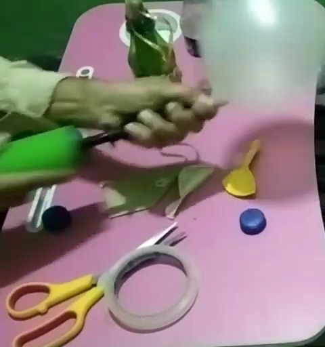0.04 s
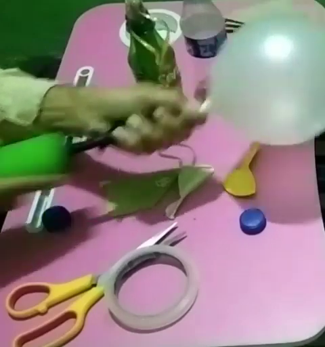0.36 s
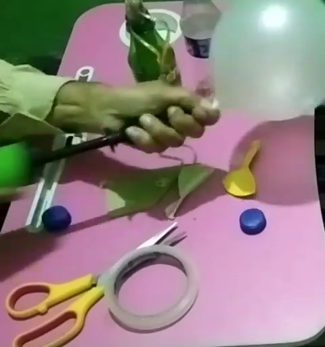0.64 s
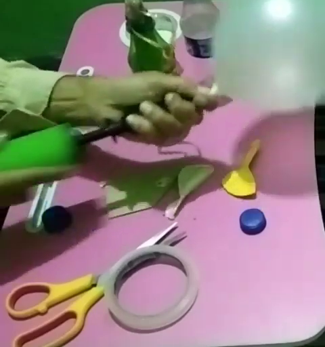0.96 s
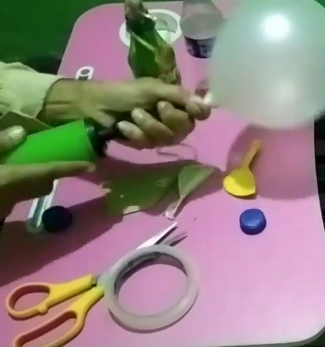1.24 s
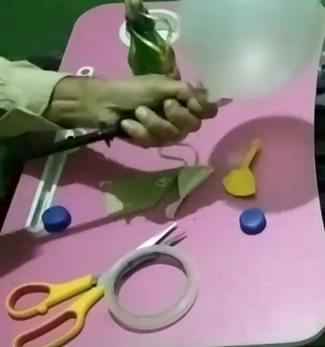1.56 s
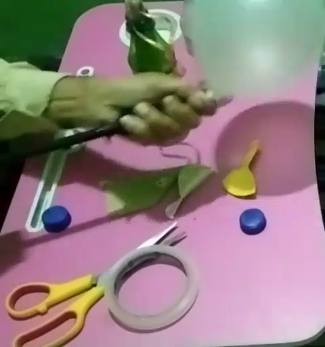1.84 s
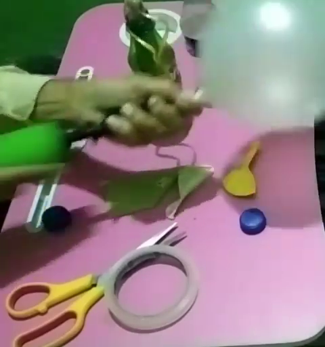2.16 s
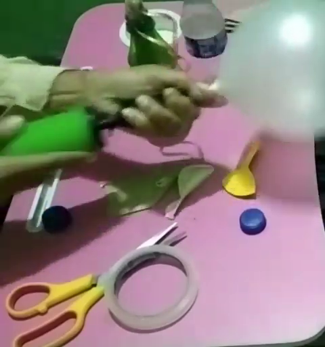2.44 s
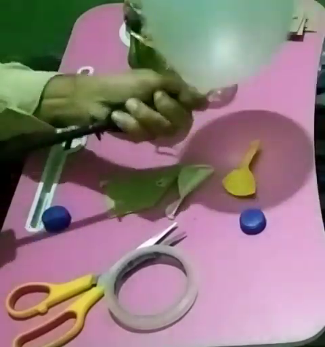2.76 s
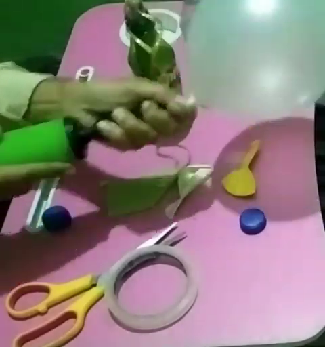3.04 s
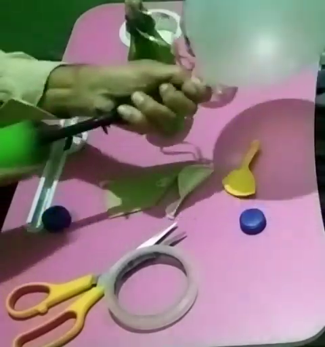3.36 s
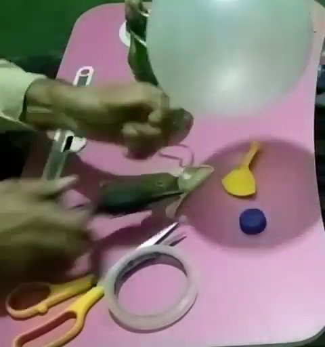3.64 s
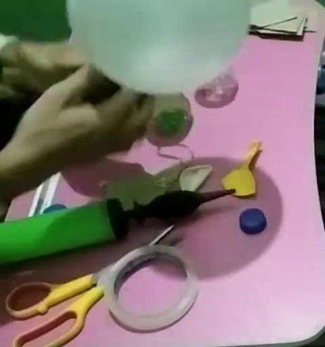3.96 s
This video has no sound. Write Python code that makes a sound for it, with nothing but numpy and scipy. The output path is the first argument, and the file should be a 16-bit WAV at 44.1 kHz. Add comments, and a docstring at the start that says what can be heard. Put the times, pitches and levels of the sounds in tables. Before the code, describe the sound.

Close up in a small, quiet room, a hand pump puffs air into a balloon about four times a second, whistling faintly between pushes. After a brief squeak and a few more strokes, it is set down with a knock.

```python
"""Quick hisses and thin whistles, about four a second: a plastic hand pump blows up a balloon.
Each push forces air through the nozzle, each pull makes the intake valve whistle, and the piston
taps as it turns round. The seal squeaks briefly and a faint hum wavers near the end.
Then the pump is put down on a table with a bump and a knock, all in a small room."""
import sys
import numpy as np
from scipy import signal
from scipy.fft import rfft, irfft
from scipy.io import wavfile
from scipy.ndimage import uniform_filter1d

SR = 44100
rng = np.random.default_rng(int(sys.argv[2]) if len(sys.argv) > 2 else 0)


def unload_audio(sound):
    """Save the sound as a 16-bit wav file, at the path given as the first command line argument."""
    columns = np.transpose(np.atleast_2d(sound))
    # keep every value between -1 and 1, then stretch to whole-number steps
    steps = np.round(np.clip(columns, -1, 1) * 32767)
    wavfile.write(sys.argv[1], SR, steps.astype(np.int16))


N = 176400
TIME = np.arange(N) / SR

# Tone of the soft hiss of indrawn air and of sliding skin: (frequency [Hz], level [dB])
SOFT_HISS = [(200, -17.5), (400, -14), (1000, -12.5), (2200, -5), (4000, 1), (5200, -1.5), (7300, 4.5),
             (9000, -2.5), (11000, -13.5), (15500, -12)]


def pump_strokes():
    """A push drives a jet of air and rubs the piston along the barrel; a pull draws air in softly."""
    # Pushes: (start [s], rise [s], hold [s], nozzle hiss [dB], piston rub [dB], intake hiss [dB])
    pushes = [(-.02, 0.028, 0.017, -27, -43.5, -46), (0.157, 0.039, .028, -23.5, -39, -40.5),
              (0.355, 0.044, 0.02, -23, -41, -46), (0.54, 0.044, 0.029, -25.5, -39.5, -46.5),
              (0.742, 0.045, 0.025, -25.5, -39.5, -47.5), (0.967, 0.053, 0.0068, -25, -45, -47),
              (1.212, 0.037, 0.022, -23.5, -43, -54.5), (1.435, 0.043, 0.01, -21.5, -43, -45.5),
              (1.667, 0.032, 0.02, -20, -41, -44.5), (1.898, 0.031, 0.025, -22.5, -40, -48),
              (2.162, 0.017, 0.025, -20, -41, -46), (2.385, 0.024, 0.033, -21.5, -42, -46),
              (2.597, 0.045, 0.0055, -19, -39.5, -45), (2.815, 0.049, 0.015, -21, -41, -50.5),
              (3.043, 0.028, 0.017, -19.5, -38.5, -46.5), (3.259, 0.039, 0.013, -23.5, -45.5, -43.5)]
    # Tones of the jet's high fizz, the piston and the sliding rod: (frequency [Hz], level [dB])
    fizz_tone = [(5000, -12), (9000, 0), (15500, 0)]
    rub_tone = [(100, -45), (300, -15.5), (450, 1), (650, 6), (900, -2.5), (1200, 1.5), (1800, -0.5),
                (2600, -3), (5000, -19.5)]
    rod_tone = [(1000, -14), (2200, -4), (4000, -1.5), (7300, 1), (10000, -10.5), (15500, -14.5)]
    jet = fizz = rub = intake = 0
    for start, rise, hold, jet_db, rub_db, intake_db in pushes:
        end = start + rise + hold
        speed = ramp(start, rise)
        leak = from_db(-36.5) * arch(start - 0.02, 0.04)  # a little air escapes ahead of the push
        flow = speed ** 1.53 * fade(end, db_per_s=472.5) + leak
        jet += from_db(jet_db) * flow
        fizz += from_db(jet_db - 14) * flow ** 1.5  # faster air sounds brighter
        rub += from_db(rub_db) * speed * fade(end, db_per_s=370.5)
        intake += from_db(intake_db) * arch(end + 0.004, length=0.14)
    air = jet * nozzle_jet() + fizz * noise(fizz_tone)
    air += rub * noise(rub_tone) + intake * noise(SOFT_HISS)
    rod = from_db(-51) * fade(3.42, db_per_s=205) * noise(rod_tone)  # lasts until the pumping stops
    hiss = swirl(air + rod)
    flutter_db = 1.76 * drift(rate_hz=90)
    return hiss * from_db(flutter_db - 3.5)


def nozzle_jet():
    """Rushing air makes a broad hiss, and the nozzle rings at a few high pitches."""
    # Tone of the hiss: (frequency [Hz], level [dB])
    jet_tone = [(500, -33.5), (1200, -18.5), (2800, -16.5), (3700, -10.5), (4600, -3), (5800, -9),
                (7400, -6.5), (8400, -3), (9300, -10.5), (11000, -14), (15500, -20)]
    # The nozzle's ringing: (pitch [Hz], width [Hz], level [dB])
    nozzle_rings = [(4820, 120, -31.5), (5460, 330, -6), (6126, 170, -1), (6780, 140, 0.5), (7300, 80, 3),
                    (7470, 100, 0.5), (7890, 130, 0.5), (8300, 160, -17), (9420, 90, -6.5)]
    white, rings = rng.standard_normal(N), 0
    for k, (hz, width, db) in enumerate(nozzle_rings):
        decay = np.exp(-np.pi * width / SR)
        feedback = [1, -2 * decay * np.cos(2 * np.pi * hz / SR), decay ** 2]
        rings += (-1) ** k * from_db(db) * (1 - decay ** 2) * signal.lfilter([1, 0, -1], feedback, white)
    return unit_level(noise(jet_tone) + from_db(2.5) * unit_level(rings))


def swirl(hiss, depth_db=2.4):
    """Swirling air favours narrow bands of pitch that keep changing."""
    bands = signal.stft(hiss, nperseg=512)[2]
    patches = rng.standard_normal(bands.shape)
    for axis in (0, 1):  # smooth across pitch, then across time
        patches = uniform_filter1d(patches, 3, axis=axis)
    gains = unit_level(from_db(depth_db * unit_level(patches)))
    return signal.istft(bands * gains, nperseg=512)[1][:N]


def valve_and_seal():
    """The intake valve whistles with a slight rasp; the seal squeaks with an overtone."""
    # Valve whistles and seal squeaks: (start [s], length [s], first [Hz], last [Hz], level [dB])
    whistles = [(0.044, 0.058, 4340, 4330, -44), (0.071, 0.066, 3634, 3700, -44),
                (0.267, 0.049, 4400, 4000, -48.5), (0.452, 0.074, 4080, 3710, -39.5),
                (0.631, .035, 4700, 4920, -43.5), (0.647, 0.063, 4080, 3900, -38),
                (0.838, 0.038, 4940, 4170, -41), (0.859, 0.041, 4100, 4000, -42.5),
                (1.087, 0.054, 3670, 3260, -42.5), (1.307, 0.031, 3920, 3310, -47),
                (1.323, 0.071, 3230, 3050, -48.5), (1.523, 0.096, 3493, 3580, -43),
                (1.767, 0.067, 3280, 3550, -44), (1.988, 0.12, 3190, 3045, -48.5),
                (2.269, 0.056, 3444, 3590, -41.5), (2.476, 0.1, 3375, 3646, -41),
                (2.712, 0.089, 2980, 3180, -51.5), (2.933, .085, 3080, 3216, -43),
                (3.149, 0.045, 4070, 3580, -38.5), (3.375, 0.045, 4200, 3510, -43)]
    squeaks = [(2.43, 0.044, 1756, 1850, -43.5), (2.859, 0.036, 1240, 1265, -27.5),
               (2.884, 0.048, 1310, 1396, -39.5)]
    wander = 0.011 * drift(rate_hz=200)
    rasp_hz, tones = 240, 0
    rasp = 1 + 0.42 * (drift(rasp_hz) + 1j * drift(rasp_hz))  # shakes both level and phase
    for row in whistles:
        level, phase = glide(*row, wander)
        tones += level * np.real(rasp * np.exp(1j * phase))
    for row in squeaks:
        level, phase = glide(*row, 2 * wander)
        overtone = from_db(-10) * drift(rasp_hz) * np.sin(2 * phase)
        tones += level * (np.real(rasp * np.exp(1j * phase)) + overtone)
    flicker_db = 2 * drift(rate_hz=60)
    return tones * from_db(flicker_db - 4.5)


def piston_taps():
    """The rod knocks in the barrel: a round thump in the hands, a hollow knock and a short tick."""
    # Taps as the stroke turns: (time [s], thump [dB], knock [dB], tick [dB])
    taps = [(.062, -62, -42, -50), (.36, -49.5, -54, -50), (.521, -71, -65, -42.5),
            (.729, -57.5, -44, -44.5), (.937, -82, -46, -57), (1.178, -64, -38, -47),
            (1.429, -43, -32, -49.5), (1.612, -72, -58, -42.5), (1.764, -47.5, -23.5, -45),
            (1.852, -50, -44, -43), (1.888, -49.5, -31.5, -51), (2.006, -39.5, -45, -52),
            (2.128, -47, -29, -41), (2.246, -40, -24, -49.5), (2.329, -64, -59.5, -43),
            (2.362, -45.5, -28, -43.5), (2.478, -36, -26, -46), (2.561, -50, -48.5, -48.5),
            (2.586, -47, -32, -45.5), (2.936, -38.5, -32.5, -75), (3.026, -48.5, -46, -65.5),
            (3.143, -39.5, -35, -50)]
    # The barrel's ringing: (pitch [Hz], level [dB], time to fade by 60 dB [s])
    barrel_modes = [(530, -21.5, .03), (712, -7, 0.02), (900, -36, .025), (1410, -31, .025)]
    # Tones of the thump and the tick: (frequency [Hz], level [dB])
    thump_tone = [(50, -4), (80, -5.5), (120, 0.5), (190, -3.5), (280, 2), (450, -3), (800, -30)]
    tick_tone = [(400, -7.5), (900, 8.5), (1800, 3), (4000, -5), (7500, -1.5), (10000, -18.5),
                 (15500, -25.5)]
    thump_rise_s, tick_rise_s = 0.0073, 0.0023
    thumps, ticks, knocks = 0, 0, []
    for at, thump_db, knock_db, tick_db in taps:
        thumps += from_db(thump_db - 10) * ramp(at, thump_rise_s) * fade(at + thump_rise_s, db_per_s=447)
        ticks += from_db(tick_db) * ramp(at, tick_rise_s) * fade(at + tick_rise_s, db_per_s=802)
        knocks.append((at, knock_db))
    return thumps * noise(thump_tone) + strike(knocks, barrel_modes) + ticks * noise(tick_tone)


def hands():
    """Skin slides lightly over plastic and rubber, and rubs dully where the grip shifts."""
    # Slides and shifts of grip: (start [s], length [s], level [dB])
    slides = [(3.211, 0.04, -48.5), (3.476, 0.046, -56.5), (3.509, 0.072, -63.5), (3.571, 0.058, -56.5),
              (3.715, 0.036, -84)]
    grips = [(0.051, 0.039, -45.5), (0.333, 0.053, -54.5), (0.934, 0.035, -57), (1.415, 0.046, -53.5),
             (1.761, 0.036, -50), (2.006, 0.054, -53.5), (2.245, 0.03, -52), (2.478, 0.044, -57),
             (2.92, 0.036, -50.5), (3.009, 0.05, -53), (3.135, 0.046, -49.5), (3.294, 0.08, -47),
             (3.38, .05, -51.5), (3.517, 0.036, -56)]
    # Tone of the dull rub: (frequency [Hz], level [dB])
    grip_tone = [(60, -11), (120, -7.5), (200, 3.5), (300, -0.5), (450, 1), (700, -5.5), (1300, -13),
                 (2500, -14.5), (5000, -15)]
    sliding = sum(from_db(db) * arch(start, length) for start, length, db in slides)
    gripping = sum(from_db(db) * arch(start, length) for start, length, db in grips)
    return sliding * noise(SOFT_HISS) + gripping * noise(grip_tone)


def set_down(knock_s=3.897):
    """The barrel scuffs down softly, then the hard end cracks on the table top and rattles out."""
    # Loudness of the scuff: (time [s], level [dB])
    landing = [(3.833, -65), (3.838, -46), (3.852, -37), (3.862, -45), (3.87, -54), (3.882, -38),
               (3.897, -64), (3.93, -68)]
    # Tones of the scuff and the crack: (frequency [Hz], level [dB])
    scuff_tone = [(170, -20), (230, 3.5), (320, -19), (430, 6.5), (600, -12), (880, -5), (1200, -22),
                  (1800, -16), (3500, -25.5), (8000, -34.5), (11000, -53)]
    crack_tone = [(250, 1.5), (600, 1), (1200, 2.5), (2500, 0), (4000, -7.5), (7500, -7.5), (10000, -25),
                  (15500, -37)]
    # Ringing after the knock: (pitch [Hz], level [dB], time to fade by 60 dB [s])
    knock_modes = [(252, -3, 0.2), (322, -4.5, 0.12), (426, -11, 0.16), (568, -5, .09), (940, -7, .08),
                   (1094, -3, 0.077), (1290, 1, 0.096), (2250, 6, .04)]
    crack = from_db(-20.5) * fade(knock_s, db_per_s=2100)
    rattle = from_db(-36) * fade(knock_s, db_per_s=398)
    knock = strike([(knock_s, -34)], knock_modes)
    knock += (TIME >= knock_s) * (crack + rattle) * noise(crack_tone)
    scuff = curve(landing) * (TIME >= landing[0][0]) * noise(scuff_tone)
    bass_cut = signal.butter(4, 194, "high", fs=SR, output="sos")
    return scuff + signal.sosfilt(bass_cut, knock)


def room_echo(sound, ring_s=0.14, delay_s=0.0086, dull_hz=8000):
    """Nearby walls send back a short, slightly dull blur of echoes."""
    t = TIME[:SR // 2]
    tail = rng.standard_normal(len(t)) * np.exp(-np.log(1000) * t / ring_s) * (t > delay_s)
    tail /= np.sqrt(np.sum(tail ** 2))
    tail = signal.sosfilt(signal.butter(2, dull_hz, fs=SR, output="sos"), tail)
    return from_db(-12) * signal.fftconvolve(sound, tail)[:N]


def faint_hum():
    """A low note near the end wavers in pitch and loudness."""
    # Rise and fall of the hum: (time [s], level [dB])
    swell = [(2.76, -56), (2.81, -56), (3.02, -48.5), (3.1, -60), (3.3, -50.5), (3.55, -56.5),
             (3.64, -68.5), (3.76, -59), (3.82, -74)]
    flicker_db = 6.5 * drift(rate_hz=31.2)
    level = curve(swell) * from_db(flicker_db - 4.5)
    level *= ramp(swell[0][0], 0.03) * fade(swell[-1][0], db_per_s=200)
    hz = 288.3 * (1 + 0.031 * drift(rate_hz=37))
    return level * np.sqrt(2) * np.sin(2 * np.pi * np.cumsum(hz) / SR)


def background():
    """Handling makes a low rumble over the quiet air of the room."""
    # Tones of the rumble and the room air: (frequency [Hz], level [dB])
    rumble_tone = [(25, -22.5), (40, -5), (65, 4), (100, -1), (200, -12), (400, -16.5)]
    air_tone = [(60, 6), (300, -9.5), (600, -12.5), (900, -28), (1130, 3), (1400, -21), (2500, -24.5),
                (7000, -28), (15000, -44)]
    # Loudness of the rumble: (time [s], level [dB])
    rumble_level = [(0, -69), (.35, -66), (.55, -74.5), (1.1, -81), (1.25, -67.5), (2.3, -68.5),
                    (3.35, -62), (3.6, -81), (4, -66)]
    return noise(rumble_tone) * curve(rumble_level) + from_db(-77.5) * noise(air_tone)


def strike(hits, modes):
    """Blows (time [s], level [dB]) ring an object's natural pitches, each with slightly random force."""
    times, db = np.transpose(hits)
    ringing = np.zeros(N)
    for k, (hz, mode_db, ring_s) in enumerate(modes):
        clicks = np.full(N, 1e-18)
        clicks[(times * SR).astype(int)] = from_db(db + mode_db + rng.normal(0, 1, len(times)))
        decay, angle = np.exp(-np.log(1000) / (ring_s * SR)), 2 * np.pi * hz / SR
        feedback = [1, -2 * decay * np.cos(angle), decay ** 2]
        ringing += (-1) ** k * signal.lfilter([0, np.sin(angle)], feedback, clicks)
    return ringing


def glide(start, length, first_hz, last_hz, db, wander):
    """The loudness and phase of one unsteady, sliding note."""
    hz = np.interp(TIME, [start, start + length], [first_hz, last_hz]) * (1 + wander)
    return np.sqrt(2) * from_db(db) * arch(start, length), 2 * np.pi * np.cumsum(hz) / SR


def noise(tone):
    """Noise of level 1, shaped by (frequency [Hz], level [dB]) points and falling away beyond them."""
    hz, db = np.transpose(tone)
    freqs = np.maximum(np.arange(N // 2 + 1) * SR / N, 1)
    edges = np.minimum(freqs / hz[0], 1) ** 2 * np.minimum(hz[-1] / freqs, 1) ** 2
    shape = from_db(np.interp(np.log(freqs), np.log(hz), db))
    return unit_level(irfft(rfft(rng.standard_normal(N)) * edges * shape, N))


def drift(rate_hz):
    """A smooth random wobble of typical size 1."""
    decay = np.exp(-2 * np.pi * rate_hz / SR)
    return unit_level(signal.lfilter([1], [1, -2 * decay, decay ** 2], rng.standard_normal(N + SR))[SR:])


def arch(start, length):
    """A smooth swell and fade."""
    return np.sin(np.pi * ramp(start, length))


def ramp(start, length):
    """A straight climb from 0 to 1, then a hold."""
    return np.clip((TIME - start) / length, 0, 1)


def fade(start, db_per_s):
    """1 until the start, then a steady decay."""
    return from_db(-np.minimum(db_per_s * np.maximum(TIME - start, 0), 200))


def curve(points):
    """Loudness through (time [s], level [dB]) points."""
    return from_db(np.interp(TIME, *np.transpose(points)))


def from_db(db):
    """Turn decibels into a multiplier."""
    return 10 ** (np.asarray(db) / 20)


def unit_level(x):
    """Scale to an average (rms) level of 1."""
    return x / np.sqrt(np.mean(x ** 2) + 1e-20)


def scene():
    """The pump close by, in its room."""
    pump = pump_strokes() + valve_and_seal() + piston_taps() + hands() + set_down()
    return (pump + room_echo(pump) + faint_hum() + background())[None]


def record(dry):
    """The highest treble is cut off steeply."""
    cutoff_hz = 15650
    return signal.sosfilt(signal.ellip(12, .1, 80, cutoff_hz, fs=SR, output="sos"), dry)


dry = scene()
out = record(dry)
unload_audio(out)
```